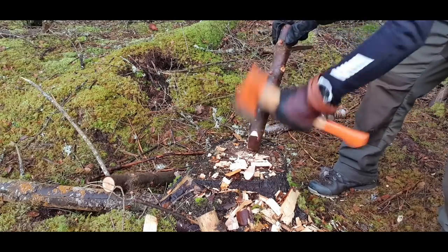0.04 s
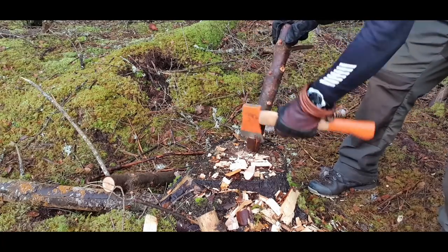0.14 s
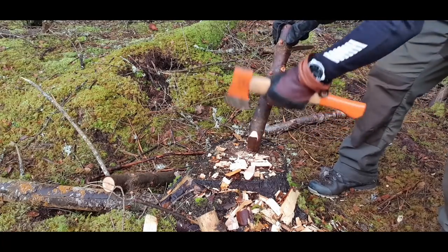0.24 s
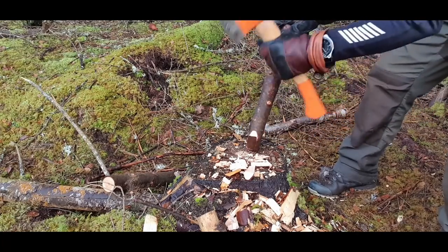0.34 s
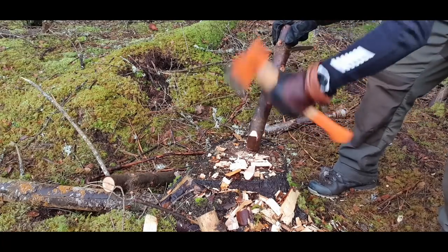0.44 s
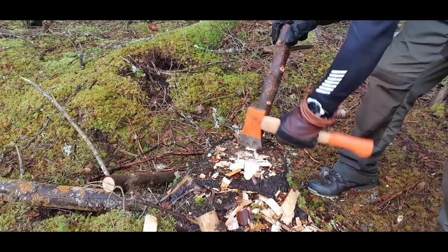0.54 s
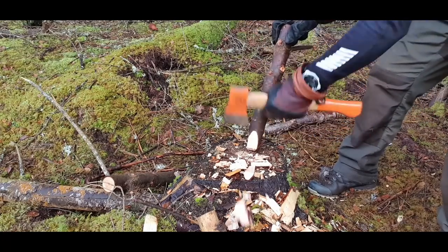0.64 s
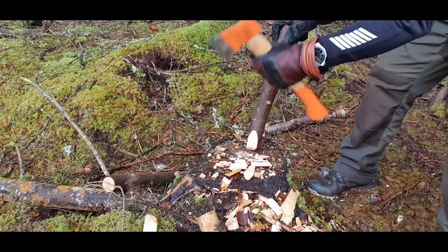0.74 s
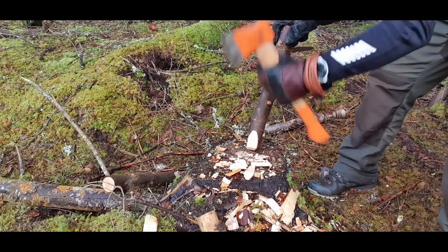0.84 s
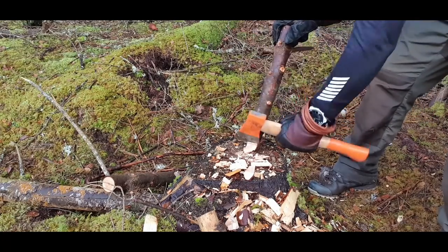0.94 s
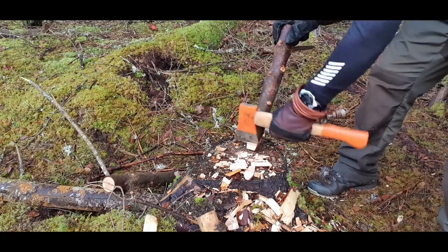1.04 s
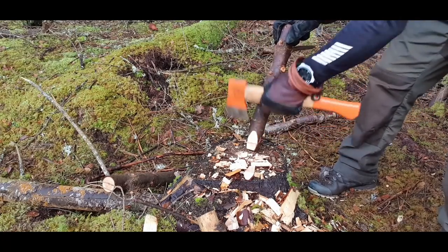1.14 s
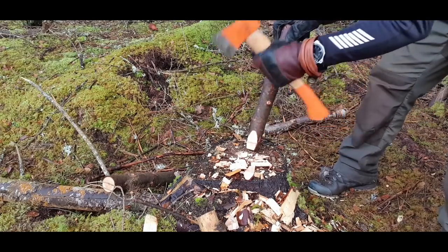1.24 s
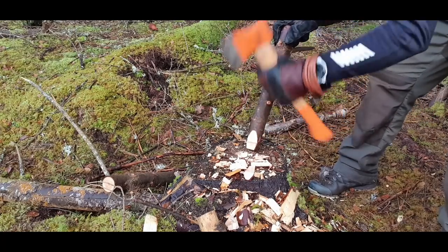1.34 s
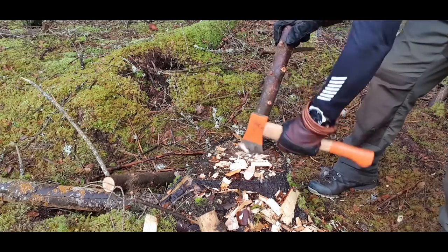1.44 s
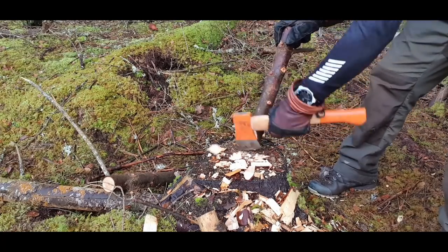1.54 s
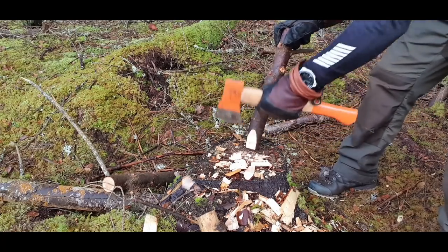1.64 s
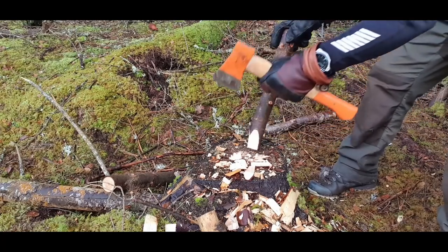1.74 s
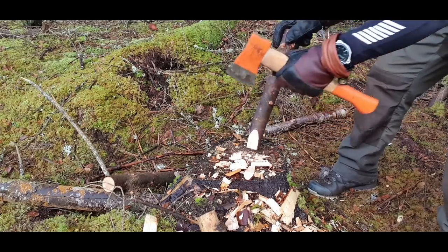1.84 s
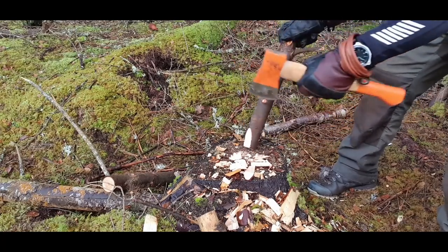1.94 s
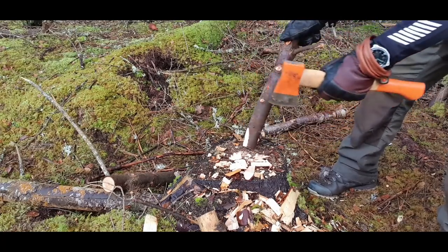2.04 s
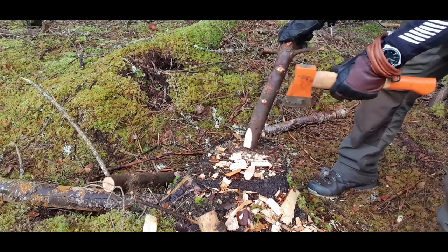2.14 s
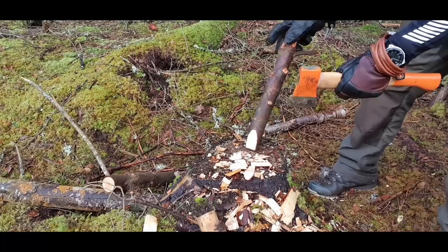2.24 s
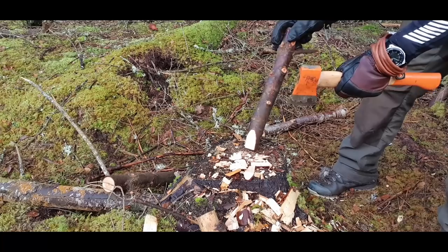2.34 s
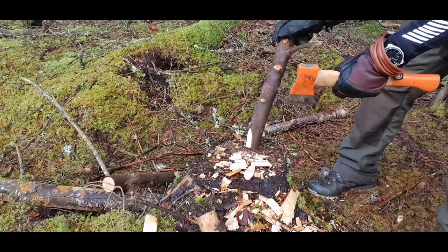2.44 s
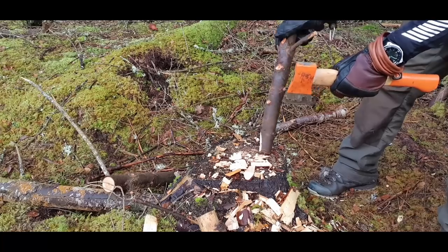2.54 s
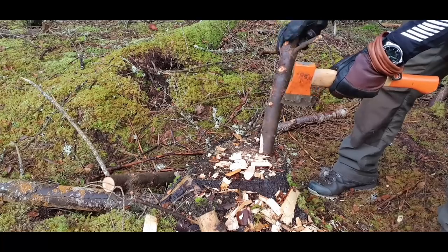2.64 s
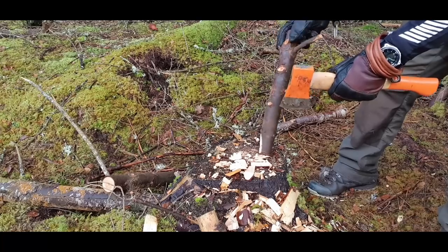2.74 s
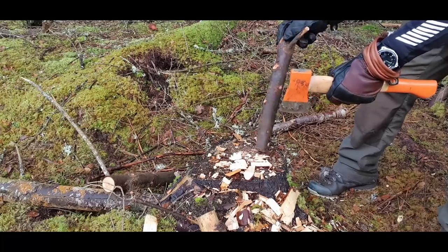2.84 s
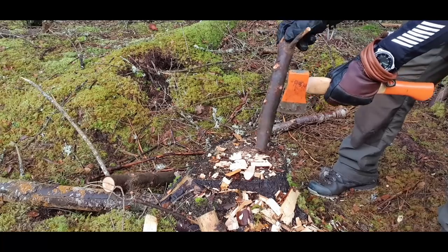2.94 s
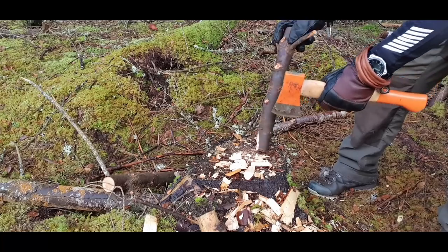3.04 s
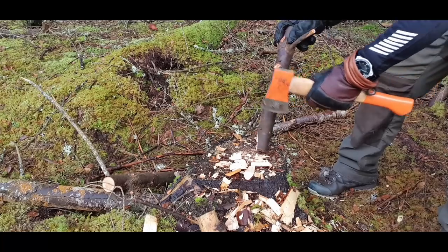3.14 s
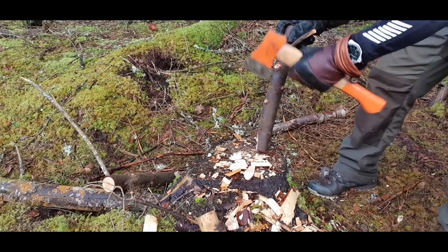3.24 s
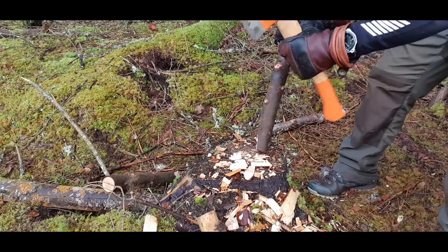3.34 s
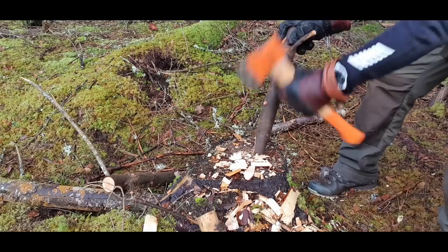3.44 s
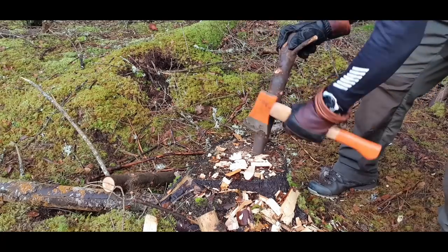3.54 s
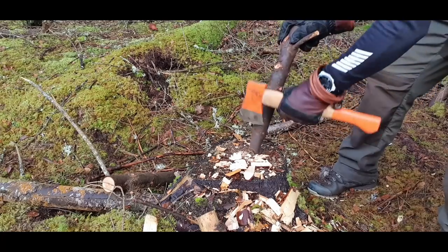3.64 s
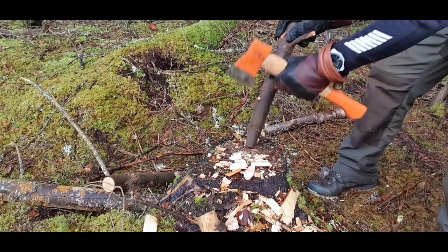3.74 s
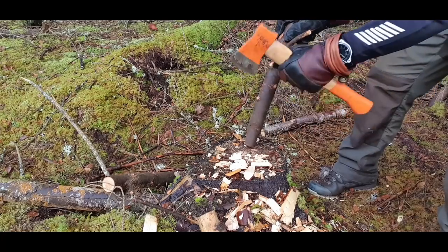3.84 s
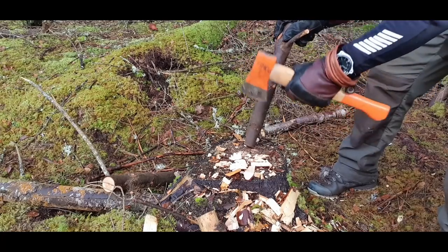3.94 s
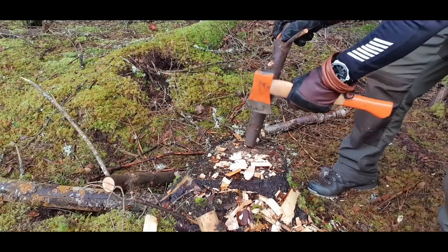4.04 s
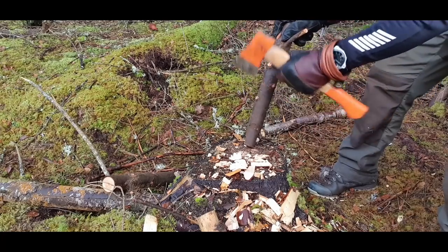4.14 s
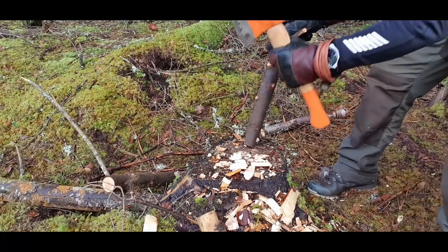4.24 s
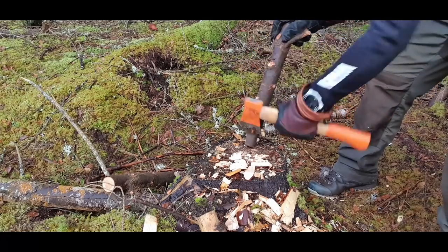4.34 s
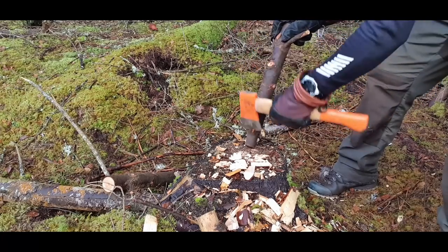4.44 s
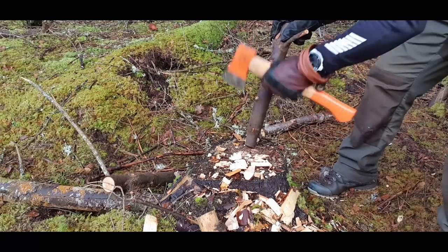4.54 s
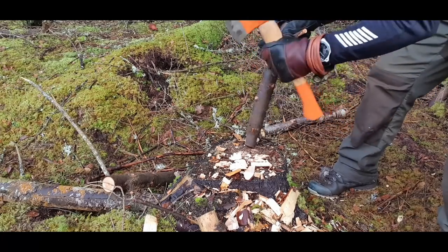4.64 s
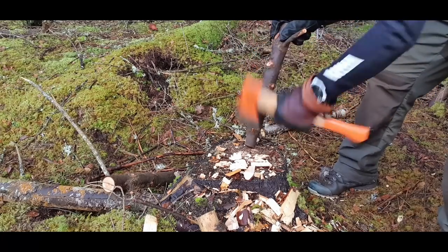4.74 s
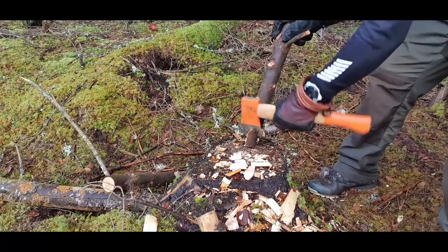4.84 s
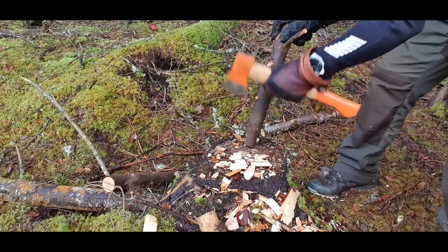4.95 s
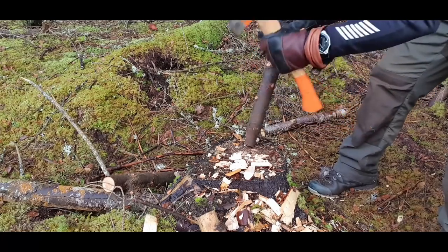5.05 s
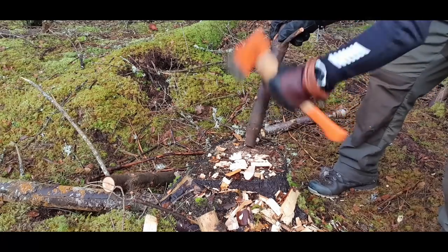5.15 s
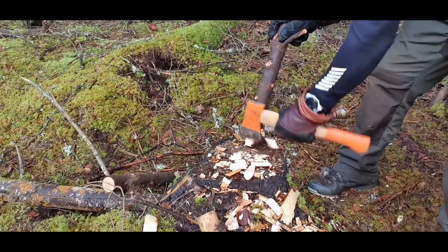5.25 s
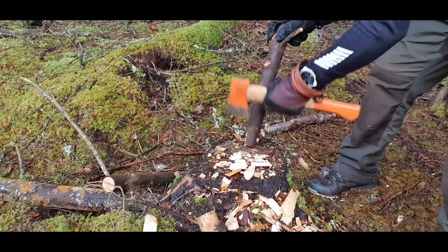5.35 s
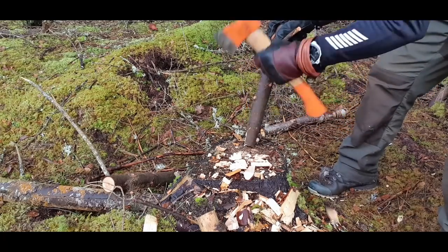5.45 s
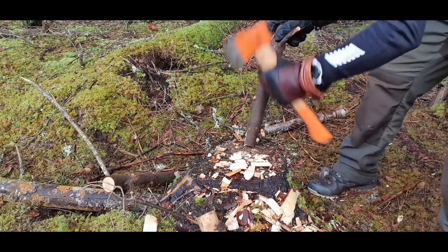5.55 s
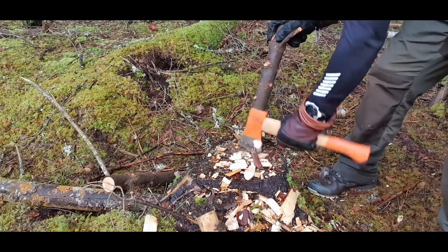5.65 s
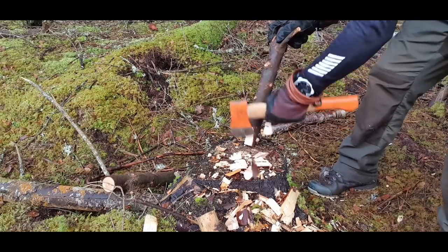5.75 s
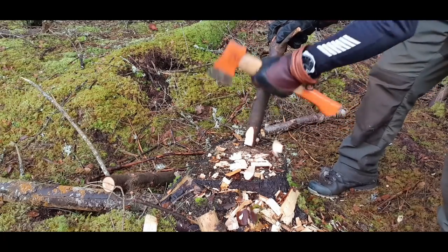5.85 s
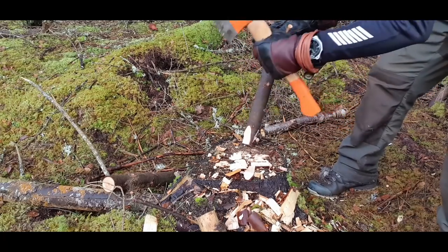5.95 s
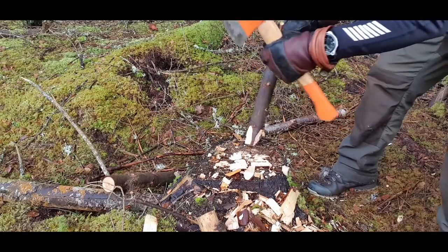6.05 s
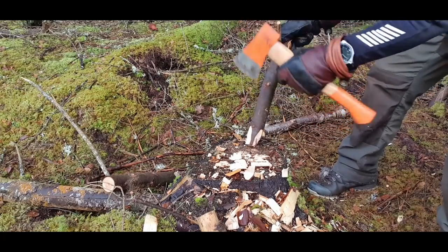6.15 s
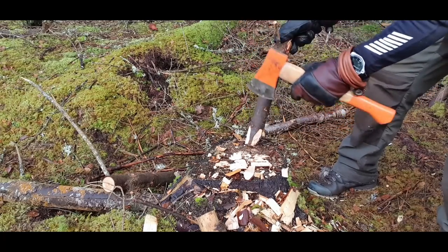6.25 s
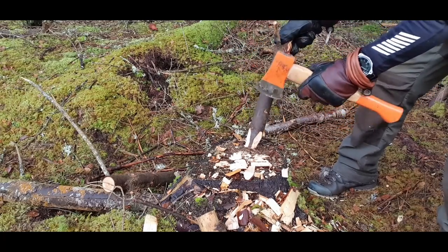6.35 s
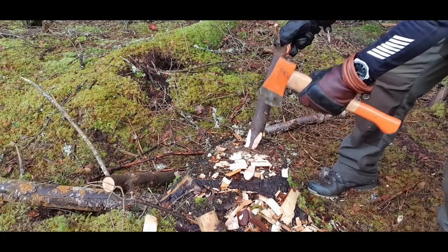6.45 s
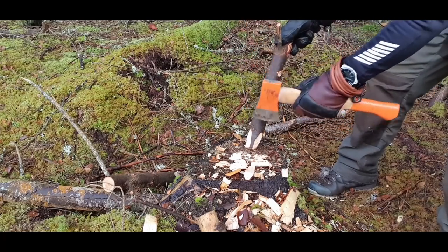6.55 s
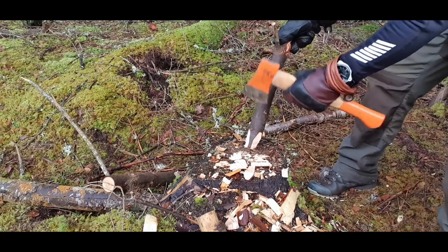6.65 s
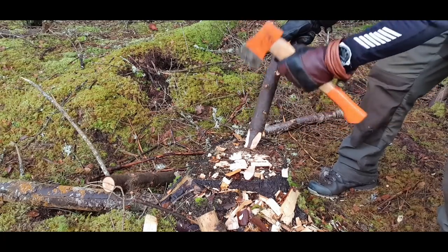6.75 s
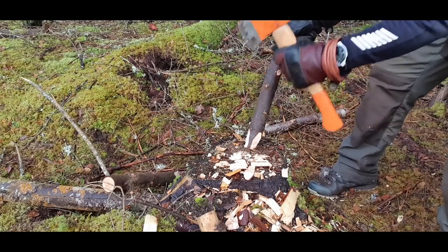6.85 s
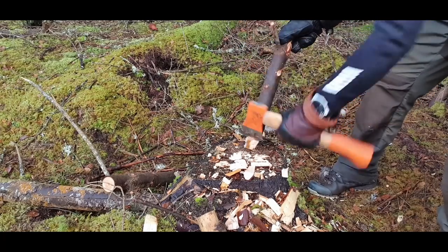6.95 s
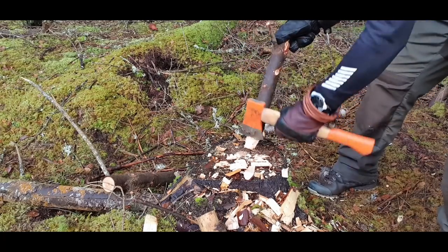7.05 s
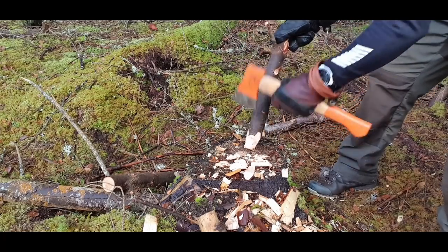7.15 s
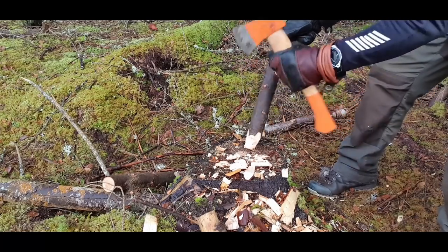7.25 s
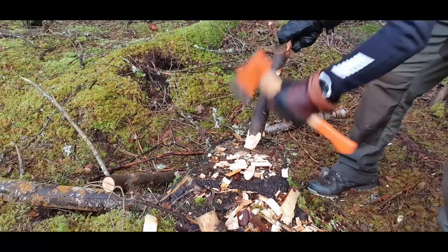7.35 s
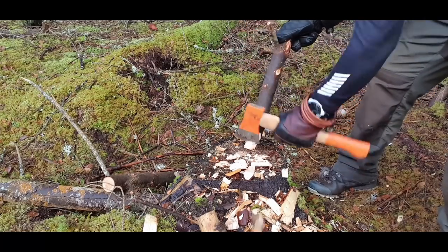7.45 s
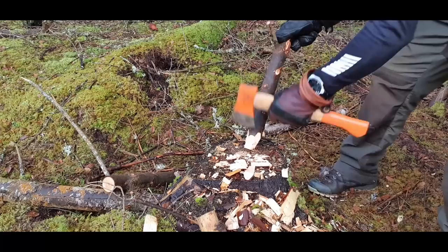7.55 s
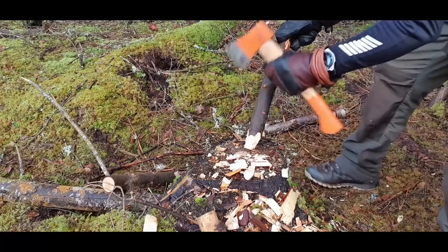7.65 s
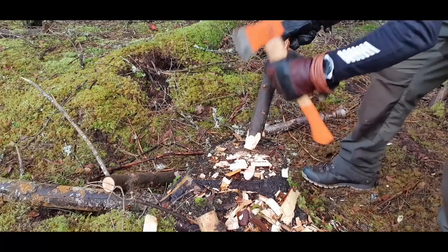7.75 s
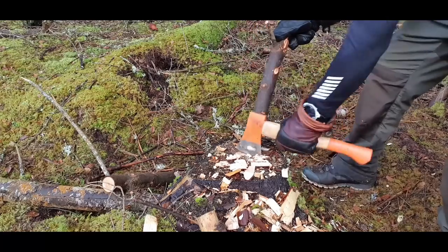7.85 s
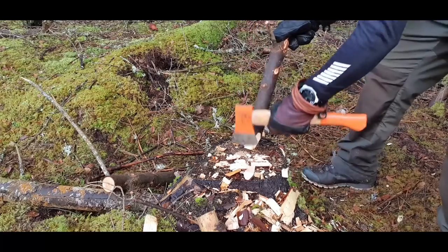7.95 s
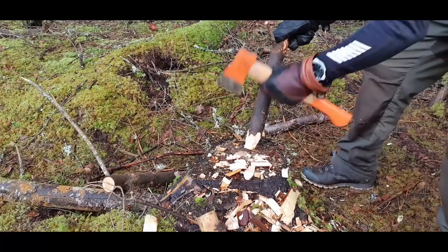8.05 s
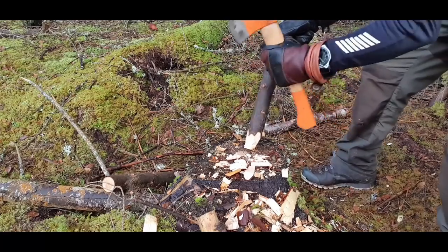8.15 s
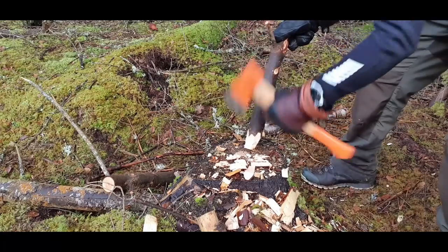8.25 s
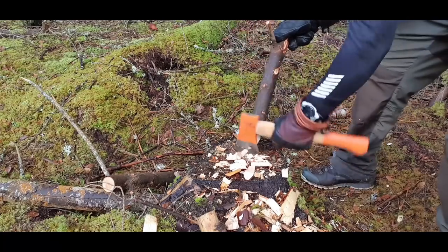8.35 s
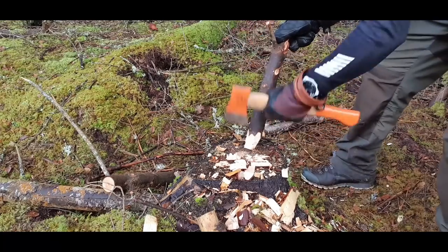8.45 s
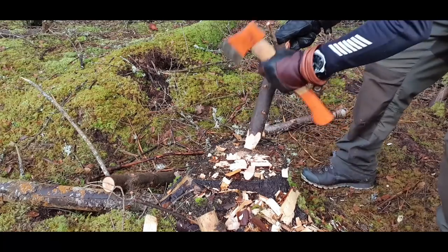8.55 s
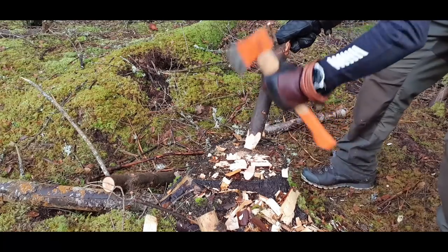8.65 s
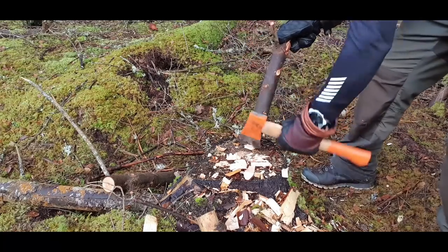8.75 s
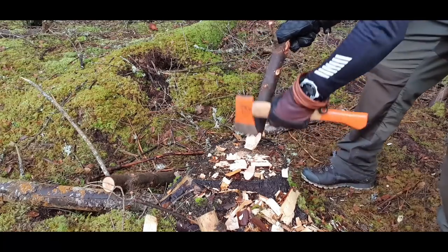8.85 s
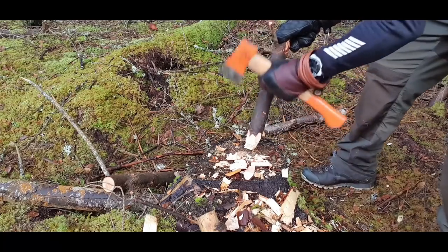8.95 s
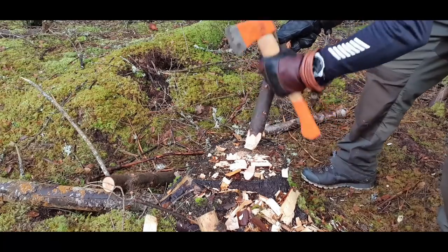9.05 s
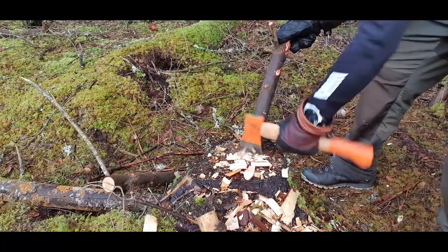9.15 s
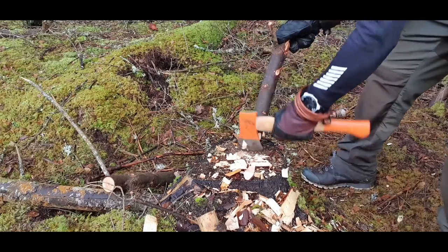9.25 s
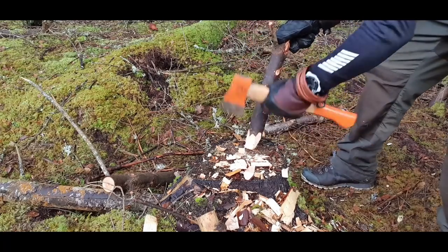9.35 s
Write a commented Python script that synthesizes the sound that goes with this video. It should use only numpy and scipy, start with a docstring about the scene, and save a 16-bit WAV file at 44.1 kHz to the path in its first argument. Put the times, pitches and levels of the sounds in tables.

```python
"""A hatchet points a branch on a stump in a quiet forest, heard from close by, low on the moss.
Each blow is a bite that knocks the branch (dying sines), then fibres that tear and snap (shaped noise)
and ring the steel head (detuned modes), then a thud on the stump that shakes the ground (gliding sines).
Splinters spray, crumbs and chips patter down, and the trees throw the blow back as sparse echoes.
Behind it lie a drifting distant wash, cloth rustle and a low wavering hum, all coloured noise."""
import sys
import numpy as np
from scipy import signal
from scipy.fft import rfft, irfft
from scipy.io import wavfile
from scipy.ndimage import uniform_filter1d

SR = 44100
rng = np.random.default_rng(int(sys.argv[2]) if len(sys.argv) > 2 else 0)


def bounce(signal):
    """Save signal as a 16-bit WAV file at the path given by the first command-line argument."""
    frames = np.transpose(np.atleast_2d(signal))
    limited = np.clip(frames, -1, 1)
    pcm = np.round(limited * 32767).astype(np.int16)
    wavfile.write(sys.argv[1], SR, pcm)


N = 414540


def amp(db):
    """Decibels to linear gain."""
    return 10 ** (np.asarray(db) / 20)


def evened(x):
    """Scales to rms 1."""
    return x / np.sqrt(np.mean(x ** 2) + 1e-20)


def read(points, hz):
    """Reads a curve between its points, along log frequency."""
    point_hz, value = np.transpose(points)
    return np.interp(np.log(hz + 1), np.log(point_hz + 1), value)


def add(mix, start_s, sound):
    """Lays a sound into the mix, cut off at the end."""
    part = mix[round(start_s * SR):][:len(sound)]
    part += sound[:len(part)]


def seconds(length_s):
    """Time axis in seconds."""
    return np.arange(round(length_s * SR)) / SR


def ring(modes, length_s):
    """Sum of dying sines, each falling 60 dB in its t60."""
    t = seconds(length_s)
    return sum(amp(db - 60 * t / t60) * np.sin(2 * np.pi * hz * t) for hz, db, t60 in modes)


def tuned(modes, factor, upper_db):
    """The same modes gripped and struck elsewhere: those below 800 Hz shift, the upper ones gain or lose."""
    return [(hz * factor, db, t60) if hz < 800 else (hz, db + upper_db, t60) for hz, db, t60 in modes]


def above(x, hz):
    """High-pass."""
    return signal.lfilter(*signal.butter(2, hz, "high", fs=SR), x)


def coloured(x, spectrum):
    """Filters x to the spectrum, rms 1."""
    hz = np.fft.rfftfreq(len(x), 1 / SR)
    return evened(irfft(rfft(x) * amp(read(spectrum, hz)), len(x)))


def hump(noise, hz, octave_db):
    """Noise gathered round one pitch, octave_db down an octave away, rms 1."""
    octaves = np.abs(np.log2((np.fft.rfftfreq(len(noise), 1 / SR) + 1) / hz))
    return evened(irfft(rfft(noise) * amp(-octave_db * octaves ** 0.92), len(noise)))


def held_steps(size):
    """Random values, each held for size samples."""
    return np.repeat(rng.standard_normal(N // size + 1), size)[:N]


def grit(grain_db, size):
    """Noise whose level jumps from one short grain to the next."""
    steps = held_steps(size)
    return rng.standard_normal(N) * amp(grain_db * steps)


# spectrum of the distant wash: pitch_hz, relative_level_db
WASH_COLOUR = [(60, -39), (130, -12.5), (200, -11), (450, -5), (900, -1.5), (1400, -2), (1650, -10.5),
               (2200, -18), (2900, -22.5), (4400, -31), (9000, -31), (12500, -39), (14500, -48),
               (15600, -72)]
# width of the wash: pitch_hz, side_against_middle_db
WASH_SIDE = [(60, -32), (180, -22.5), (550, -30.5), (1650, -35.5), (4970, -5.5), (15000, -6.5)]
# slow swells: time_s, wash_db, sleeve_and_glove_rustle_db (before the stir)
BREEZE = [(0.0, -64, -79), (0.7, -63, -80), (1.2, -63, -76), (1.7, -63.5, -75), (2.2, -64, -78),
          (2.75, -62.5, -75.5), (3.1, -61, -77), (3.7, -59.5, -79), (4.3, -61.5, -78.5), (4.87, -61, -77),
          (5.4, -64, -78.5), (5.9, -63, -73), (6.25, -64.5, -78.5), (6.9, -64, -79.5), (7.45, -62, -77),
          (7.7, -59, -69), (8.05, -64, -78), (9.4, -63, -78)]
# spectrum of the cloth: pitch_hz, relative_level_db
RUSTLE = [(500, -13.5), (1500, -5.5), (2500, -4), (4500, -3), (7000, -2.5), (10000, -4.5), (12500, -19),
          (14500, -33), (15600, -50)]
# low hum wavering: time_s, level_db
HUM = [(0.0, -67), (1.7, -65.5), (2.2, -68), (3.3, -65), (3.8, -60), (4.1, -65), (6.1, -65), (6.55, -77),
       (7.1, -68), (9.4, -67)]
# spectrum of the hum: pitch_hz, relative_level_db
HUM_COLOUR = [(25, -39), (36, -18), (50, -11.5), (58, 1.5), (68, -9), (95, -9), (130, -18), (200, -44)]


def air():
    """Distant wash with drifting patches, rustle of cloth and a low hum, as middle and side."""
    frames, hz = N // 256 + 5, np.fft.rfftfreq(1024, 1 / SR)
    a, b, c, d, patches = rng.standard_normal((frames, 513, 5)).T
    # smoothed across pitch, then time
    patches = evened(uniform_filter1d(uniform_filter1d(patches, 12, 0), 14, 1))
    grains = np.array([a + 1j * b, (c + 1j * d) * amp(read(WASH_SIDE, hz))[:, None]])
    grains = grains * amp(read(WASH_COLOUR, hz)[:, None] + 0.47 * patches)
    wash = signal.istft(grains, nperseg=1024, noverlap=768)[1][:, :N]
    t, (time_s, wash_db, rustle_db) = np.arange(N) / SR, np.transpose(BREEZE)
    out = wash / wash[0].std() * amp(np.interp(t, time_s, wash_db))

    cloth = [coloured(grit(1.8, size=60), RUSTLE) for _ in range(2)]
    drift = uniform_filter1d(uniform_filter1d(rng.standard_normal(N), 3000), 3000)
    stir_db = 1.5 * evened(drift) - .3  # cloth stirs unevenly
    side_cut_db = np.array([[0], [-9.0]])
    out += amp(stir_db) * cloth * amp(side_cut_db + np.interp(t, time_s, rustle_db))

    hum = coloured(rng.standard_normal(N), HUM_COLOUR)
    out[0] += hum * amp(np.interp(t, *np.transpose(HUM)))
    return out


# how long the trees echo: pitch_hz, t60_s
TREES = [(150, 0.068), (350, .2), (650, .2), (1000, 0.58), (1350, 0.31), (2200, 0.43), (3500, 0.14),
         (6800, 0.35), (8500, .12), (12000, 0.14)]


def trees(x):
    """Sparse echoes of random sign, each band dying at its own speed; two unrelated tails."""
    taps = np.zeros((2, SR // 2))
    # one echo at a random place in every 20 samples
    at = np.arange(400, SR // 2 - 20, 20) + rng.integers(0, 20, (2, (SR // 2 - 401) // 20))
    np.put_along_axis(taps, at, rng.choice([-1., 1.], at.shape), 1)
    hz, t, bands = signal.stft(taps, SR, nperseg=256)
    fade = amp(-60 * t / read(TREES, hz)[:, None])
    tail = signal.istft(bands * fade, SR, nperseg=256)[1]
    return signal.oaconvolve(x[None], tail / np.linalg.norm(tail[0]), axes=1)[:, :N]


# steady modes of the soil: pitch_hz, level_db, t60_s
GROUND = [(91, -13, 0.84), (58, -16.5, 0.51)]
# arrivals of the ground wave, the later ones back from roots and rock: delay_s, level_db
BOUNCES = [(.002, 4.5), (.125, -7), (.23, -16)]


def ground():
    """Roots and soil shake after each blow; the higher waves arrive first, so each arrival glides down."""
    soil, shake, t = np.zeros(N), np.zeros(SR), seconds(0.63)
    turns = 44. * t + 1.7 * (1 - np.exp(-t / .03))  # glides from about 100 to 44 Hz
    glide = amp(7.5 - 180.0 * t) * np.cos(2 * np.pi * turns) * (1 - np.exp(-t / 0.075))
    for delay_s, db in BOUNCES:
        add(shake, delay_s, amp(db) * glide)
    add(shake, 0, ring(GROUND, .9) * (1 - np.exp(-seconds(.9) / 0.051)))
    for s, *_, shake_db, _, _, _, _ in BLOWS:
        add(soil, s, amp(shake_db) * shake)
    return soil


CHIP_DELAY_S, CHIP_OVER_CRUMBS_DB = .05, 0.1  # chips fall by chance after a blow
STRAY_DB, TICK_SPREAD_DB = -69, 2.0  # floor of the strays; chance lifts any tick


def small_ticks():
    """Rows like TICKS by chance: a few chips after every blow, and strays at any time."""
    chips = [(s + .02 - CHIP_DELAY_S * np.log(u), crumb_db + CHIP_OVER_CRUMBS_DB + 4.0 * np.log(u), v, w)
             for s, *_, crumb_db, _, _, _ in BLOWS for u, v, w in rng.random(size=(9, 3))]
    strays = [(u * N / SR, STRAY_DB, v, w) for u, v, w in rng.random(size=(30, 3))]
    return [(s, db - TICK_SPREAD_DB * np.log(v), 2800 * 3.3 ** w) for s, db, v, w in chips + strays]


# chips and twigs ticking: start_s, level_db, pitch_hz
TICKS = [(0.177, -29.5, 2600), (0.2084, -49.5, 3590), (0.2454, -47.5, 6160), (0.7742, -52, 3340),
         (0.801, -48.5, 3430), (1.071, -52, 7100), (1.4067, -57, 8800), (1.1707, -46, 3800),
         (1.8155, -54, 3420), (2.4418, -48.5, 7360), (2.72, -60, 6000), (2.8737, -60, 6000),
         (3.1249, -55, 6100), (3.5957, -32, 6020), (3.619, -39, 8400), (3.741, -55, 2925),
         (3.7798, -51.5, 8840), (3.9867, -51, 8370), (4.139, -53, 6000), (4.4494, -42, 6200),
         (4.5077, -39, 8160), (4.5351, -37.5, 9040), (4.8414, -27, 9000), (4.8794, -38, 6120),
         (4.955, -50.5, 2630), (5.315, -48, 8000), (5.566, -58, 4190), (5.5904, -59, 8000),
         (5.741, -42, 6990), (5.8048, -52, 3520), (5.9857, -50, 8360), (6.4935, -55, 6250),
         (7.0743, -53, 3940), (7.1084, -47, 8700), (7.4981, -32, 8200), (7.5627, -50.5, 8500),
         (7.7202, -47, 3030), (7.7623, -49.5, 6560), (8.8114, -48.5, 3590)]
# brief swishes and rubs of hand, cloth and blade:
# start_s, length_ms, level_db (before the stutter), pitch_hz, steepness_db (an octave away)
SWISHES = [(.762, 52, -61, 4000, 6), (1.125, 35, -61, 9300, 14), (8.85, 35, -64, 11000, 20),
           (3.48, 75, -62, 2400, 22), (3.51, 40, -62, 3800, 18), (7.312, 30, -68, 2300, 70),
           (7.312, 40, -64, 1030, 40), (3.505, 43, -60, 9000, 22), (3.65, 72, -59, 5500, 9),
           (4.5, 45, -54, 8500, 8), (7.53, 45, -52, 8700, 22), (7.69, 100, -59, 2500, 5)]
# spectra of tearing fibres and of falling crumbs: pitch_hz, relative_level_db
FIBRES = [(600, -28.5), (1500, -4), (2500, 0.5), (4500, -0.5), (7000, -4.5), (10000, -4.5), (12000, -17.5),
          (15500, -22.5)]
CRUMBS = [(800, -19), (2000, 0), (4000, 3), (7000, 6), (10000, 0), (13000, -8), (15500, -12)]
TEAR_DB, CRUMBS_FALL_S = -33, .13  # fibres tear all through a cut; crumbs keep falling after it
TICK_TOP_HZ = 11000  # ticks and swishes are dull above this


def splinters():
    """Noise bursts: tearing under the edge, sharp cracks, spray, raining crumbs, single ticks, swishes."""
    tear, rain, out, swish = np.zeros((4, N))
    t = seconds(.4)
    for s, _, _, _, thud_ms, _, _, crumb_db, _, _, spray_db in BLOWS:
        after = np.maximum(t - thud_ms / 1000, 0)
        add(tear, s, amp(TEAR_DB - 2500. * after) + amp(spray_db - 500. * t))
        add(rain, s, amp(crumb_db - 90. * t) / (1 + np.exp((t - CRUMBS_FALL_S) / .02)))
    for s, crack_db, *_ in SNAPS:
        add(tear, s, amp(crack_db - 8300.0 * seconds(.01)))

    t, ticks = seconds(.05), TICKS + small_ticks()
    for (s, db, hz), noise in zip(ticks, rng.standard_normal((len(ticks), len(t)))):
        fade = amp(db - 6000. * t) + amp(db - 19. - 1100. * t)  # sharp click, softer tail
        add(out, s, fade * hump(noise, hz, 15.0))
    for (s, ms, db, hz, octave_db), noise in zip(SWISHES, rng.standard_normal((len(SWISHES), SR))):
        rub = hump(noise, hz, octave_db)[:round(ms / 1000 * SR)]
        add(swish, s, amp(db) * rub * signal.windows.tukey(len(rub), .8))

    fibres = coloured(grit(3.5, size=20), FIBRES)
    out += swish * amp(3.5 * held_steps(120) - 1.5)  # rubbing stutters
    out = signal.lfilter(*signal.butter(2, TICK_TOP_HZ, fs=SR), out)
    return out + tear * fibres + rain * coloured(grit(5.5, size=70), CRUMBS)


# fibres giving way: start_s, crack_db, branch_knock_db, head_low_db, head_middle_db, head_high_db
SNAPS = [(0.1405, -29, -32.5, -17, -25, -31), (0.1432, -24, -32, -8.5, -33, -33),
         (0.5545, -26, -40, -26, -36, -42), (0.5571, -9, -36, -8, -18.5, -28),
         (0.5618, -26, -40, -28, -24, -30), (0.9825, -19, -16, -18, -24, -18),
         (0.9836, -15, -31.5, -10, -30, -18), (1.4731, -17, -38.5, -20, -31, -30),
         (1.4754, -24, -36.5, -16.5, -33, -17), (1.4787, -18, -31, -14, -24, -18),
         (3.5522, -11, -32.5, -14, -30, -29), (3.5568, -22, -14.5, -20, -38, -36),
         (4.4082, -14, -34.5, -16.5, -29, -27), (4.4104, -19, -19, -17, -31, -27),
         (4.8264, -18, -41.5, -19, -35, -36), (4.8291, -12, -37, -16, -29, -27),
         (5.2525, -16, -41, -20, -28, -26), (5.2545, -24, -24, -21, -29, -24),
         (5.2567, -8, -38, -18, -17, -26), (5.6628, -18, -38.5, -20, -35, -24),
         (5.666, -28, -38, -24.5, -36, -17), (5.6705, -29.5, -27, -8, -25, -22),
         (5.6728, -12, -24, -9, -33, -18), (7.0125, -12, -30, -28, -16, -11),
         (7.0142, -10, -12, -26, -18, -9), (7.0165, -24, -33, -35, -30, -30),
         (7.4481, -17, -17, -9, -20, -15), (7.8775, -21.5, -42.5, -21.5, -38, -29),
         (7.8845, -30, -16, -22, -43, -33), (7.887, -21, -15, -8, -38, -24),
         (7.8963, -36, -20, -22.5, -47, -50), (8.3415, -14, -31.5, -12.5, -27, -12.5),
         (8.3451, -40, -24, -17, -32, -31), (8.3478, -31, -21, -19, -34, -30),
         (8.7674, -30, -41, -23, -29, -18), (8.7704, -21, -30.5, -11, -27, -25),
         (8.7727, -25, -38, -12, -28, -16), (8.7742, -21, -13, -13.5, -27, -14),
         (9.2009, -30, -28.5, -14, -38, -30), (9.2033, -19, -25.5, -19, -29, -14),
         (9.2067, -13.5, -13, -13, -22, -10.5), (9.2083, -17, -30, -8, -18, -24)]
# modes of the steel head: pitch_hz (before the grip), level_db, t60_s
HEAD = [(3507, -6.5, 0.098), (3400, -8.5, 0.028), (3595, -11.5, .04), (3050, -15.5, 0.0067),
        (6880, -2.5, .07), (8650, -2.5, 0.027), (9300, -6, 0.017), (11300, -15.5, .02)]
# blurred ring that the head keeps: pitch_hz, relative_level_db
LINGER = [(2700, -30), (3250, -12), (3400, -2), (3600, -1), (3800, -7), (4300, -28)]


def steel():
    """Each snap rings the head afresh, detuned by the grip of the wood, which chokes it as the cut ends."""
    head, free, low_linger, middle_linger = np.zeros((4, N))
    starts = np.array([row[0] for row in SNAPS] + [N / SR])
    for (s, _, _, *levels_db), grip in zip(SNAPS, rng.standard_normal((len(SNAPS), len(HEAD)))):
        # low, middle and high modes part at 5000 and 7500 Hz
        modes = [(hz * (1 + .012 * g), db + levels_db[np.digitize(hz, [5000, 7500])], t60)
                 for (hz, db, t60), g in zip(HEAD, grip)]
        late = np.maximum(seconds(.1) - (starts[starts > s].min() - s), 0)  # the next jolt damps this ring
        add(head, s, ring(modes, .1) * amp(-9000. * late))

    t = seconds(.06) - .002
    for s, _, _, _, thud_ms, *_, low_db, middle_db, _ in BLOWS:
        add(free, s - .002, amp(-4000. * np.maximum(t - thud_ms / 1000, 0)))
        add(low_linger, s + thud_ms / 1000, amp(low_db - 100. * seconds(.5)))
        add(middle_linger, s + thud_ms / 1000, amp(middle_db - 200.0 * seconds(.5)))
    # a blurred ring hangs on
    low = low_linger * coloured(rng.standard_normal(N), LINGER)
    middle = middle_linger * hump(rng.standard_normal(N), 6750., 700.)
    return head * free + low + middle


# hatchet blows: start_s, bite_db, branch_pitch_factor, branch_upper_modes_db, thud_delay_ms, thud_db,
# ground_shake_db, crumbs_db, head_low_linger_db, head_middle_linger_db, splinter_spray_db
BLOWS = [(0.1386, -6.5, 1.09, 4.5, 8.5, -21, -36, -53, -56, -60, -49),
         (0.5524, -12, 1.03, 3.3, 8.6, -26, -51, -56, -55, -63, -45.5),
         (0.9809, -6.5, 1.016, 1.2, 5.96, -22, -34.5, -56, -59, -71, -41),
         (1.4736, -6, 1.08, 4.5, 16.6, -13.2, -39, -58.5, -58.5, -59, -33),
         (3.5512, -6, 1.04, -2.5, 4.73, -11, -30.5, -55, -59.5, -65, -42),
         (4.4068, -6.5, 1.12, -4.5, 5.54, -11.5, -31.5, -54, -59.5, -69.5, -45),
         (4.8269, -7, 1.08, 2.5, 8.3, -21, -42, -49, -54, -68.5, -48),
         (5.2515, -5.5, 1.06, 0.4, 8.9, -20, -46, -50, -61, -76, -50),
         (5.664, -5, 1.09, 1.9, 15.1, -9, -41.5, -52.5, -58, -61, -40),
         (7.0112, -9, 1.01, -3, 7.3, -20, -32, -51.5, -60, -69, -40.5),
         (7.4462, -16.5, 0.836, -4, 3.8, -21, -35.5, -52, -53, -63, -32),
         (7.878, -7, 1.14, 0.9, 16.4, -5.5, -39, -63, -62, -67, -39),
         (8.3417, -12.5, 1.04, 2.4, 7.8, -14, -43.5, -56, -60, -53, -33.5),
         (8.7672, -8.5, 1.01, 6.0, 7, -17, -39, -59, -58, -68, -50.5),
         (9.2006, -18.5, 1.44, 9.5, 15, -14, -41, -59.2, -57, -52, -39.5)]
# modes of the branch and of the stump, before tuning: pitch_hz, level_db, t60_s
BRANCH = [(633, 0.5, 0.0155), (1355, 1, 0.017), (2213, -12.5, 0.006), (380, -21, .08), (1000, -16, .02)]
STUMP = [(364, 3, 0.017), (895, -2, 0.013), (170, -14.5, 0.025), (96, -17, 0.067)]
# soft bumps on stump and moss: start_s, level_db, pitch_hz
BUMPS = [(1.583, -38.5, 291), (3.824, -39, 195), (6.431, -42.5, 115), (8.44, -41.5, 300), (9.297, -27, 556)]
STUMP_PITCH, STUMP_SAG_PER_DB = .93, .008  # factor at 0 dB; a harder thud sounds lower


def wood():
    """Struck wood as dying sines: bite and knocks in the branch, thud and bumps on the stump."""
    branch, stump = np.zeros(N), np.zeros(N)
    for s, bite_db, factor, upper_db, thud_ms, thud_db, *_ in BLOWS:
        add(branch, s, amp(bite_db) * ring(tuned(BRANCH, factor, upper_db), .1))
        stump_modes = tuned(STUMP, STUMP_PITCH - STUMP_SAG_PER_DB * thud_db, 0)
        add(stump, s + thud_ms / 1000, -amp(thud_db) * ring(stump_modes, .1))
    for (s, _, knock_db, *_), chance in zip(SNAPS, rng.random(len(SNAPS))):
        add(branch, s, amp(knock_db) * ring(tuned(BRANCH, 1.0 + .3 * chance, 3.0), .1))
    for s, db, hz in BUMPS:
        modes = [(hz, -2, 5.9 / hz + .004), (1.533 * hz, -6, 5.2 / hz)]
        add(stump, s, amp(db) * ring(modes, .1))
    soft = signal.windows.hann(11)  # the edge sinks in over a fraction of a millisecond
    return np.convolve(above(branch, 390.0) + above(stump, 70.), soft / soft.sum())[:N]


def scene():
    """Everything sits near the middle; the sides add a little scatter, echo, shake and air."""
    near, soil = wood(), ground()
    bright = steel() + splinters()
    echo, other_echo = trees(near + bright)
    scatter = signal.oaconvolve(bright, evened(rng.standard_normal(24)) / 5)[:N]  # smears the treble
    middle, side = air()
    middle = middle + near + soil + bright + amp(-30.0) * echo
    side = side + amp(-25.) * scatter + amp(-54.5) * other_echo
    side = side + amp(-34.0) * np.roll(near, 40) + amp(-30.0) * np.roll(soil, 200)
    return np.array([middle + side, middle - side])


EDGE_HZ = 15650


def record(dry):
    """The loudest peaks round off at full scale; then the band limit."""
    held = dry / (1 + np.abs(dry) ** 6) ** (1 / 6)
    low_pass = signal.firwin(511, EDGE_HZ, window=("kaiser", 9), fs=SR)
    return signal.oaconvolve(held, low_pass[None], "same")


dry = scene()
out = record(dry)
bounce(out)
```